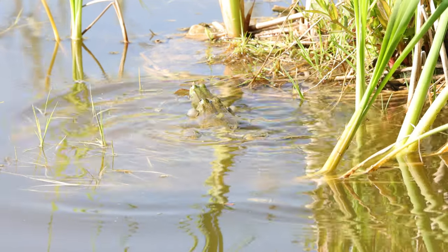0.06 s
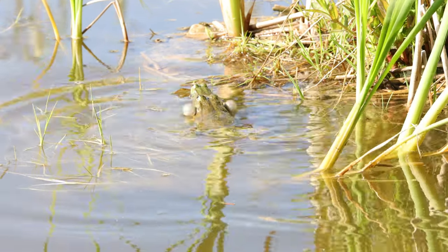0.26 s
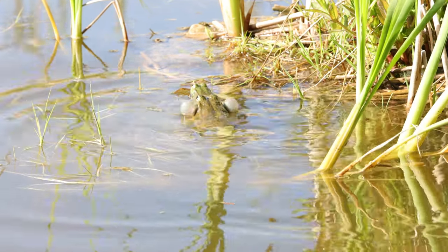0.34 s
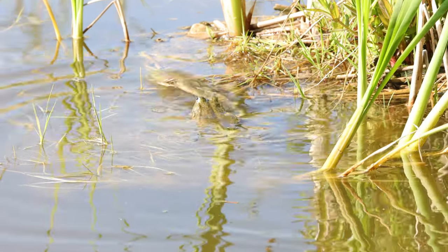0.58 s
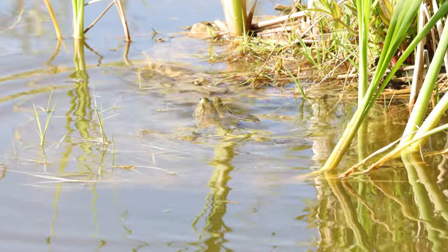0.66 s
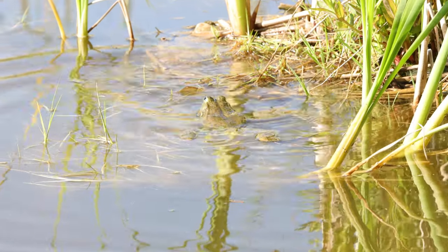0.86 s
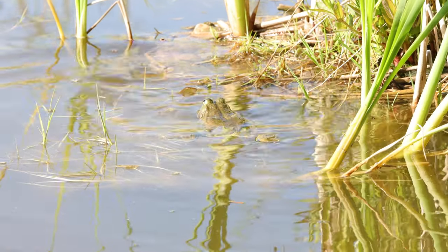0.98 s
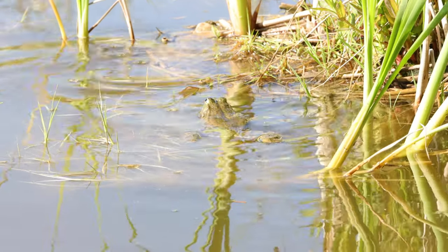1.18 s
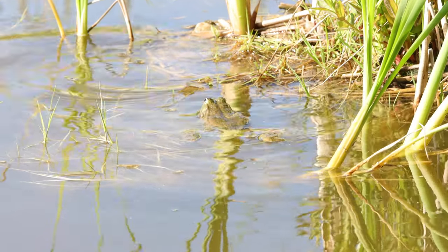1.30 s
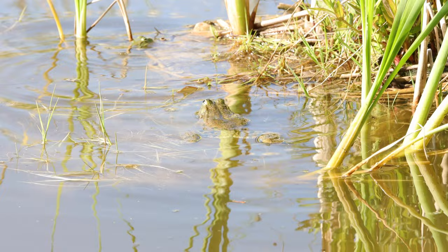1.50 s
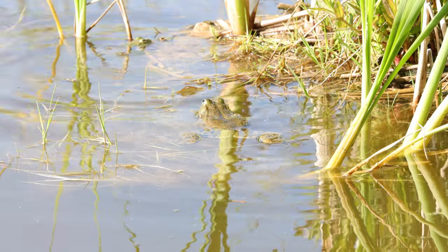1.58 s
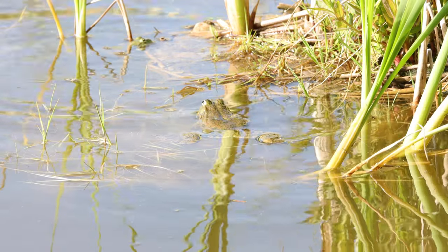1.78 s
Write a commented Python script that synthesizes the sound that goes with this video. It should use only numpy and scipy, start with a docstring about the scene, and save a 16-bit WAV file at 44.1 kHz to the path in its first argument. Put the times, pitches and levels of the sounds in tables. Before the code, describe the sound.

A close frog croaks, then cackles five times, followed by soft bubbling and dripping pond water.

```python
"""A reedy pond plips and ticks as a close frog starts a smooth moan: throat pulses ringing its body. By 0.3 s
the moan has swelled into a rough croak. From 0.36 s five short cackles follow, each a burst of slowing pulses
ringing the vocal sacs. After 0.77 s the stirred water carries on alone with rising bubbles and bright droplets.
The bank echoes these close sounds, and behind them all the way lie soft air, a low rumble, faint far frogs, a
steady high band of distant insects or birds and very low, even thuds."""
import sys
import numpy as np
from scipy import signal
from scipy.io import wavfile
from scipy.ndimage import uniform_filter1d

SR = 44100
rng = np.random.default_rng(int(sys.argv[2]) if len(sys.argv) > 2 else 0)


def generate_wav(sig):
    """Save sig (samples, or channels by samples) to the path in sys.argv[1] as 16-bit PCM at SR."""
    pcm = np.round(np.clip(np.atleast_2d(sig).T, -1, 1) * 32767).astype(np.int16)
    wavfile.write(sys.argv[1], SR, pcm)


N = 81585
TIME = np.arange(N) / SR

# throat pulse rate through the croak: time_s, rate_hz
CROAK_PULSE_RATE = [(.05, 326.5), (.094, 365.6), (.116, 380.5), (.148, 391.2), (.162, 372.6), (.184, 340),
                    (.203, 295.8), (.244, 293.1), (.262, 276.5), (.281, 292), (.294, 233.5), (.305, 261.8),
                    (.317, 293.7), (.329, 208.8), (.338, 220.6), (.349, 276.4), (.359, 233.6), (.371, 128)]
# the croak's envelope: time_s, level_db
CROAK_ENVELOPE = [(.05, -51), (.095, -34.5), (.13, -37.5), (.147, -27.5), (.162, -35), (.178, -30.5),
                  (.2, -33), (.24, -28.5), (.278, -23), (.316, -14), (.335, -18.5), (.348, -15),
                  (.366, -14.5), (.376, -35), (.39, -64)]
# the body's main resonance as it glides: time_s, pitch_hz
BODY_GLIDE = [(.05, 1116), (.15, 1087), (.185, 950), (.22, 865), (.295, 830), (.335, 950), (.355, 1062),
              (.375, 1100)]
# the body's steady resonances: pitch_hz, width_hz, moan_gain_db, rough_gain_db
BODY_MODES = [(361, 52, -5, -41), (523, 246, 5, -10), (1348, 230, -16, -7), (1780, 78, -26.5, -21.5)]
# thin throat overtone, sinking as the croak peaks: time_s, pitch_hz, gain_db
OVERTONE_GLIDE = [(.1, 4100, -12.5), (.27, 4740, -10), (.3, 4300, -17.5), (.325, 4030, -8),
                  (.348, 3880, -8), (.368, 3784, -13.5)]
# the overtone's partials: pitch_ratio, gain_db
OVERTONE_PARTIALS = [(1, -7), (2.02, -14), (3, -16.5)]
# the five cackles: start_s, length_s, gain_db, first_rate_hz, sac_pitch_hz, pan_db
CACKLE_BURSTS = [(0.3645, 0.047, -15, 475.4, 2036, 11), (0.4505, 0.048, -12.5, 450.8, 2115, 11),
                 (0.5436, 0.043, -11, 450.2, 2233, 11.5), (0.6332, 0.041, -12.5, 435.3, 2218, 13),
                 (0.7215, 0.042, -13.5, 411.1, 2126, 11.5)]
# resonances of the vocal sacs: pitch_ratio, width_hz, gain_db, pan_share
SAC_MODES = [(.24, 170, -33.5, 0), (.35, 266, -16, 0.65), (0.672, 161, -20.5, 1), (0.999, 154, 1, 0.76),
             (1.1, 261, -60, 0.4), (1.42, 286, -47, 0.24), (2.4, 213, -23, 1)]
# clear bubbles: start_s, length_s, level_db, first_pitch_hz, last_pitch_hz
BUBBLES = [(0.028, 0.035, -41.5, 689, 925), (.053, 0.024, -38, 578, 860), (0.511, 0.019, -48, 444, 520),
           (0.53, 0.011, -39.5, 715, 1700), (0.586, 0.053, -45, 495, 520), (0.76, 0.039, -36.5, 490, 1223),
           (.807, 0.013, -31.5, 1965, 1660), (0.979, 0.018, -38, 1100, 1294),
           (1.023, 0.028, -43, 547, 1200), (1.067, 0.025, -44.5, 567, 635), (1.167, 0.057, -41, 412, 813),
           (1.168, 0.0097, -38.5, 1600, 1720), (1.225, 0.045, -39.5, 491, 860),
           (1.247, 0.014, -43.5, 1030, 2500), (1.331, 0.012, -35, 502, 850), (1.348, 0.018, -34, 546, 1120),
           (1.373, 0.027, -37.5, 529, 1017), (1.598, 0.0306, -41.5, 477, 816),
           (1.614, 0.015, -42, 640, 735), (1.642, 0.032, -45, 550, 900), (1.72, 0.015, -36, 1123, 3770),
           (1.761, 0.017, -43.5, 560, 1420), (1.775, 0.016, -36.5, 1475, 1780),
           (1.811, 0.029, -46, 860, 1100)]
# droplets and bursting films: start_s, ring_gain_db, pitch_hz, snap_gain_db
DROPLETS = [(0.0567, -44, 3380, -34.5), (.083, -38.5, 4300, -39), (0.165, -31, 6500, -54),
            (.226, -26, 6070, -42), (0.806, -26, 5720, -22.5), (.809, -23, 1730, -34),
            (0.887, -32.5, 1190, -60), (.913, -26, 2040, -35), (0.9824, -26, 2220, -31.5),
            (1.067, -36, 1100, -52), (1.102, -32.5, 2600, -54), (1.131, -39.5, 3500, -49),
            (1.123, -42, 6860, -28.5), (1.155, -34, 2220, -66), (1.166, -32.5, 1540, -66),
            (1.21, -27.5, 2550, -32.5), (1.217, -32.5, 1450, -30), (1.266, -27.5, 2190, -52),
            (1.275, -29, 2200, -34), (1.3302, -32.5, 1165, -32.5), (1.3708, -33, 6550, -31),
            (1.4263, -31, 2030, -25), (1.447, -33.5, 1180, -40), (1.4755, -29.5, 1940, -55),
            (1.5102, -26, 8300, -26), (1.575, -38, 7500, -30), (1.596, -36.5, 1120, -31.5),
            (1.621, -36, 1860, -40), (1.6547, -42, 7150, -32.5), (1.718, -31, 3000, -35),
            (1.814, -26.5, 2110, -27)]
# how hard the water is stirred, riding the gurgle and the fine ticks: time_s, gain_db
WATER_STIR = [(0, 6.5), (.5, 4), (.7, 6.5), (.82, 3.5), (.94, -7.5), (1.1, 2.5), (1.28, -11), (1.4, -5),
              (1.54, -10), (1.63, -11), (1.85, 0)]
# slap echoes off the bank: delay_s, gain_db
BANK_ECHOES = [(.0105, -14.5), (.019, -23), (.031, -29.5)]
# tone colour of the air over the pond: frequency_hz, gain_db
AIR_COLOUR = [(15, -29), (25, -1.5), (102, -11.5), (335, -22.5), (714, -21), (1160, -19), (1330, -28.5),
              (2160, -20), (3920, -31), (4740, -43), (5570, -33), (13200, -33), (16000, -41)]
# far frog chorus, then distant insects or birds: centre_hz, width_hz, level_db, waver_db, waver_rate_hz
FAR_BANDS = [(2330, 87, -79, -12, 12), (4787, 490, -57.5, 0, 8.5)]

ROUGH_FROM_S, ROUGH_FULL_S = .24, .303
SMOOTH_JITTER_S, ROUGH_JITTER_S, ROUGH_SHIMMER_DB = .000015, .00011, 2.2
BODY_WIDTH_HZ, BODY_ONSET_S = 174, .0001
RASP_HZ, RASP_WIDTH_HZ, RASP_DB = 3330, 540, -3.5
OVERTONE_WIDTH_HZ, OVERTONE_ONSET_S = 220, .0004
OVERTONE_SCATTER = .0086   # pulse-to-pulse spread, as a share of the pitch

RATE_SAG, SAG_CURVE = .58, 1.9   # share of the pulse rate a cackle loses; how late it loses it
CACKLE_FULL_AT, CACKLE_FADES_AT = .54, .91   # shares of its length
CACKLE_JITTER_S, CACKLE_SHIMMER_DB = .00002, .9
SAC_ONSET_S, SAC_RISE = .00014, .06   # the rise is a share of the pitch, over one cackle
AFTER_RING_WIDTH_HZ, AFTER_RING_DB = 25, -32

PLIP_FADE_S, PLIP_DECAY_DB, PLIP_CURVE = .0027, 5.5, 1.724
POP_DB, POP_HZ, POP_T60_S = -2.5, 1780, .012
GURGLES_PER_S, GURGLE_DB, GURGLE_SPREAD_DB = 24, -50, 3
GURGLE_S, GURGLE_RISE = .011, 1.2
TICK_T60_S, TICK_GRIT, SNAP_ATTACK_S, SNAP_T60_S = .017, .36, .0006, .0095
SPATTER_WITHIN_S, SPATTER_DB = .012, -12
FINE_TICKS_PER_S, FINE_TICK_DB, FINE_SPREAD_DB = 140, -45.5, 8

TAIL_T60_S, TAIL_DB = .33, -18
AIR_DB, RUMBLE_HZ, RUMBLE_DB, STEREO_LIKENESS = -52, 14.3, -47, .39
THUD_FIRST_END_S, THUD_EVERY_S, THUD_S, THUD_DB = .245, .2475, .04, -36
TOP_CUT_HZ = 16000


def croak():
    """Even throat pulses ring the body as a moan; under full pressure they turn uneven and harsh."""
    t = TIME[(TIME >= CROAK_PULSE_RATE[0][0]) & (TIME < CROAK_PULSE_RATE[-1][0])]
    pulses = pulse_times(t, at(CROAK_PULSE_RATE, t))
    rough = np.interp(pulses, [ROUGH_FROM_S, ROUGH_FULL_S], [0, 1])
    chance = rng.standard_normal((200, len(BODY_MODES) + 3))[:len(pulses)].T
    pulses = pulses + chance[0] * (SMOOTH_JITTER_S + rough * ROUGH_JITTER_S)
    body_shimmer, throat_shimmer, *mode_shimmers = chance[1:] * rough * ROUGH_SHIMMER_DB
    body = ring(pulses, at(BODY_GLIDE, pulses), BODY_WIDTH_HZ, body_shimmer / 2, BODY_ONSET_S)
    for (hz, width, moan_db, rough_db), shimmer in zip(BODY_MODES, mode_shimmers):
        body += ring(pulses, hz, width, moan_db + rough * (rough_db - moan_db) + shimmer, BODY_ONSET_S)
    voice = butter(body, 2330, "low", order=5) + throat_edge(pulses, throat_shimmer, chance[-1])
    voice = butter(voice, 524, "high", order=4)
    # even out the voice so that the envelope shapes the swell
    power = uniform_filter1d(uniform_filter1d(voice ** 2, size=500), size=300)
    levelled = voice / np.sqrt(np.abs(power) + np.mean(voice ** 2) / 10)
    return panned(levelled * from_db(at(CROAK_ENVELOPE, TIME)), pan_db=-1)


def throat_edge(pulses, shimmer_db, pitch_chance):
    """The croak's bright edge: the same pulses ring a broad rasp and a thin overtone."""
    edge_db = at(OVERTONE_GLIDE, pulses, column=2) + shimmer_db
    rasp = ring(pulses, RASP_HZ, RASP_WIDTH_HZ, edge_db + RASP_DB, OVERTONE_ONSET_S)
    edge = butter(rasp, 5200, "low", order=4)
    hz = at(OVERTONE_GLIDE, pulses) * (1 + OVERTONE_SCATTER * pitch_chance)
    for ratio, db in OVERTONE_PARTIALS:
        edge += ring(pulses, ratio * hz, ratio * OVERTONE_WIDTH_HZ, edge_db + db, OVERTONE_ONSET_S)
    return edge


def cackles():
    """Short bursts of slowing pulses swell, ring the inflated sacs and break off."""
    out = np.zeros((2, N))
    for start, length, gain_db, rate_hz, sac_hz, pan_db in CACKLE_BURSTS:
        t = np.arange(int(length * SR)) / SR
        pulses = pulse_times(t, rate_hz * (1 - RATE_SAG * (t / length) ** SAG_CURVE))
        progress = pulses / length
        jitter, shimmer = rng.standard_normal((40, 2))[:len(pulses)].T
        swell_db = gain_db + np.interp(progress, [0, CACKLE_FULL_AT, CACKLE_FADES_AT, 1], [-16, 0, 0, -13])
        hits = start + pulses + CACKLE_JITTER_S * jitter
        hit_db = swell_db + CACKLE_SHIMMER_DB * shimmer
        hz = sac_hz * (1 + SAC_RISE * (progress - CACKLE_FULL_AT))
        for ratio, width, db, pan_share in SAC_MODES:
            out += panned(ring(hits, ratio * hz, width, hit_db + db, SAC_ONSET_S), pan_db * pan_share)
        # the sacs ring on faintly after the pulses stop
        out += ring(start + pulses, sac_hz, AFTER_RING_WIDTH_HZ, swell_db + AFTER_RING_DB)
    return butter(butter(out, 490, "high", order=4), 5530, "low", order=14)


def pulse_times(t, rate_hz):
    """The throat fires one pulse for each full cycle of its rate."""
    cycles = np.cumsum(rate_hz) / SR
    return np.interp(np.arange(np.ceil(cycles[-1])), cycles, t)


def ring(pulses, hz, width_hz, db, onset_s=.00002):
    """One resonance: each pulse starts a damped sine with its own pitch and strength."""
    out = np.zeros(N)
    t = np.arange(int(min(2 / width_hz, .1) * SR)) / SR
    for start, pitch, gain in np.broadcast(pulses, hz, from_db(db)):
        age = np.maximum(t - (start * SR % 1) / SR, 0)   # pulses can land between samples
        envelope = np.tanh(age / onset_s) * np.exp(-np.pi * width_hz * age)
        add(out, start, gain * envelope * np.sin(2 * np.pi * pitch * age))
    return out


def bubbles():
    """Clear plips over a gurgle of small ones that follows the stir of the water."""
    out = np.zeros(N)
    for start, length, db, first_hz, last_hz in BUBBLES:
        add(out, start, plip(length, db, first_hz, last_hz))
    for when, pitch, size in rng.random((int(GURGLES_PER_S * N / SR), 3)):
        start, hz = when * N / SR, 800 * 3.5 ** pitch
        db = GURGLE_DB + at(WATER_STIR, start) + GURGLE_SPREAD_DB * (2 * size - 1)
        add(out, start, plip(GURGLE_S * (.5 + size), db, hz, hz * GURGLE_RISE))
    return panned(out, pan_db=-.5)


def plip(length, db, first_hz, last_hz):
    """A bubble forms with a dull pop, then rings and glides, nearly always up, as it surfaces."""
    t = np.arange(int(length * SR)) / SR
    hz = first_hz + (last_hz - first_hz) * (t / length) ** PLIP_CURVE
    fades = np.minimum(t / PLIP_FADE_S, 1) * np.minimum((length - t) / PLIP_FADE_S, 1)
    tone = fades * from_db(-PLIP_DECAY_DB * t / length) * np.sin(2 * np.pi * np.cumsum(hz) / SR)
    pop = noise_band(rng.standard_normal(SR // 4), POP_HZ / 4, POP_HZ)[:len(t)]
    return from_db(db) * (tone + pop * from_db(POP_DB - 60 * t / POP_T60_S))


def droplets():
    """Clear ticks, each trailed by a spatter of two smaller drops, over a sprinkle of fine ones."""
    out = np.zeros(N)
    for start, db, hz, snap_db in DROPLETS:
        add(out, start, tick(db, hz, snap_db))
        for delay, pitch in rng.random((2, 2)):
            spatter_hz = min(hz * 2 ** (pitch * 1.4 - .5), SR / 4)
            spatter = tick(db + SPATTER_DB, spatter_hz, snap_db + SPATTER_DB)
            add(out, start + SPATTER_WITHIN_S * delay, spatter)
    for when, pitch, size in rng.random((int(FINE_TICKS_PER_S * N / SR), 3)):
        start = when * N / SR
        db = FINE_TICK_DB + at(WATER_STIR, start) + FINE_SPREAD_DB * (2 * size - 1)
        add(out, start, tick(db, hz=1500 * 6 ** pitch, snap_db=db - 7.5))
    return panned(out, pan_db=3.7)


def tick(db, hz, snap_db):
    """One droplet: a bright snap and a brief gritty ring."""
    t = np.arange(SR // 25) / SR
    grit, white = rng.standard_normal((2, len(t)))
    tone = np.sin(2 * np.pi * hz * t) + TICK_GRIT * noise_band(grit, hz / 2, hz * 2)
    snap = noise_band(white, 5000, 11000, order=1) * np.minimum(t / SNAP_ATTACK_S, 1)
    return (tone * from_db(db - 60 * t / TICK_T60_S) + snap * from_db(snap_db - 60 * t / SNAP_T60_S)) / 2


def bank_reverb(close):
    """Dull slaps off the bank and a faint tail scattered by the reeds."""
    t = TIME[:SR // 2]
    response = rng.standard_normal((2, len(t))) * from_db(-60 * t / TAIL_T60_S)
    response *= from_db(TAIL_DB) / np.sqrt(np.sum(response ** 2) / 2)
    for delay, db in BANK_ECHOES:
        response[:, int(delay * SR)] += from_db(db)
    wet = signal.fftconvolve(close.mean(axis=0)[None], response, axes=1)[:, :N]
    return butter(wet, 9500, "low")


def pond_air():
    """A soft bed of air, coloured band by band, over a deep rumble."""
    air, edges = 0, np.geomspace(25, 17000, num=20)
    white = stereo_noise(), stereo_noise()
    colour_hz, colour_db = np.array(AIR_COLOUR).T
    for k, band in enumerate(zip(edges, edges[1:])):
        db = np.interp(np.log(band).mean(), np.log(colour_hz), colour_db)
        air = air + from_db(db) * butter(white[k % 2], band, "band")
    rumble = butter(stereo_noise(), RUMBLE_HZ, "low")
    return from_db(AIR_DB) * rms_one(air) + from_db(RUMBLE_DB) * rms_one(rumble)


def far_frogs_and_insects():
    """Two narrow noise bands: a far chorus that wavers at random and a steady high band of distant insects or
    birds."""
    out = np.zeros((2, N))
    for hz, width, db, waver_db, rate_hz in FAR_BANDS:
        waver = np.interp(TIME * rate_hz, np.arange(1000), rng.standard_normal(1000))
        out += from_db(db + waver_db * waver) * noise_band(stereo_noise(), hz - width / 2, hz + width / 2)
    return out


def thuds():
    """Soft, very low thuds at an even pace."""
    out = np.zeros(N)
    for end in np.arange(THUD_FIRST_END_S, N / SR, THUD_EVERY_S):
        add(out, end - THUD_S, from_db(THUD_DB) * np.hanning(int(THUD_S * SR)))
    return butter(out, hz=3.3, kind="high", order=1)


def stereo_noise():
    """White noise, partly alike in the two channels."""
    mid, side = rng.standard_normal((2, N))
    return np.sqrt(1 + STEREO_LIKENESS) * mid + np.sqrt(1 - STEREO_LIKENESS) * side * [[1], [-1]]


def noise_band(white, low_hz, high_hz, order=2):
    """One band of the given noise, at rms 1."""
    return rms_one(butter(white, [low_hz, high_hz], "band", order))


def butter(x, hz, kind, order=2):
    """Butterworth filter; corners are held between 5 Hz and just under half the sample rate."""
    return signal.sosfilt(signal.butter(order, np.clip(hz, 5, .49 * SR), kind, fs=SR, output="sos"), x)


def from_db(db):
    """Decibels to gain."""
    return 10 ** (np.asarray(db) / 20)


def rms_one(x):
    """Scale to rms 1."""
    return x / np.sqrt(np.mean(x ** 2) + 1e-20)


def at(curve, time_s, column=1):
    """Read a curve at the given times."""
    curve = np.array(curve)
    return np.interp(time_s, curve[:, 0], curve[:, column])


def panned(x, pan_db):
    """Mono to stereo; positive is left."""
    return x * from_db([[pan_db / 2], [-pan_db / 2]])


def add(out, start_s, sound):
    """Mix a sound in from a given time."""
    i = max(int(start_s * SR), 0)
    out[..., i:i + sound.shape[-1]] += sound[..., :max(N - i, 0)]


def scene():
    """Frog and water up front, their echoes, and the pond behind."""
    close = croak() + cackles() + bubbles() + droplets()
    return close + bank_reverb(close) + pond_air() + far_frogs_and_insects() + thuds()


def record(dry):
    """A steep low-pass trims the very top of the mix."""
    return signal.sosfilt(signal.ellip(10, .2, 80, TOP_CUT_HZ, fs=SR, output="sos"), dry)


dry = scene()
out = record(dry)
generate_wav(out)
```